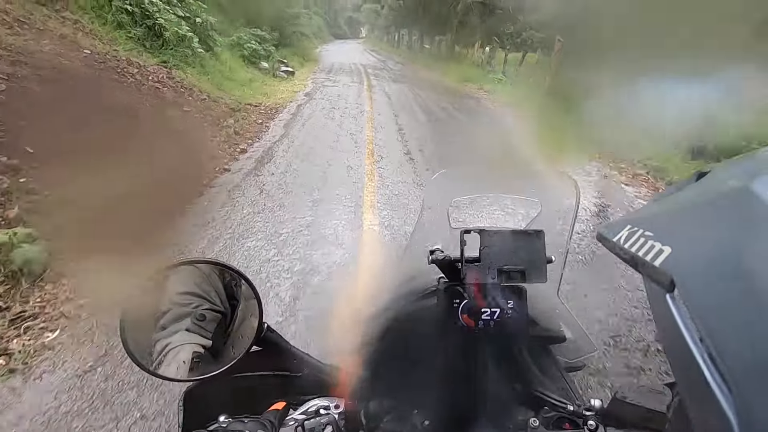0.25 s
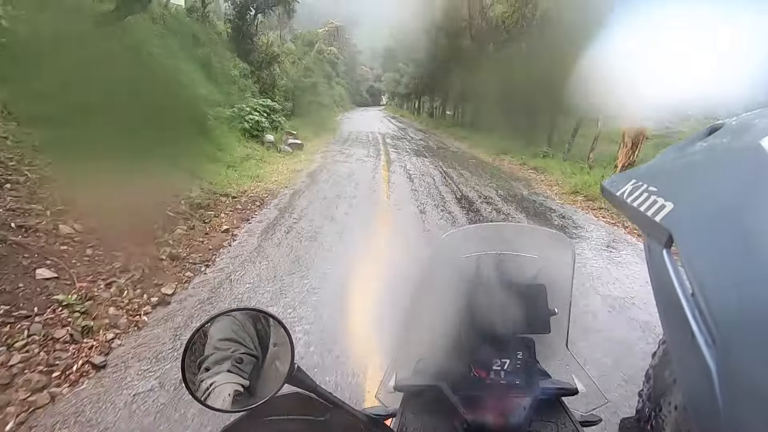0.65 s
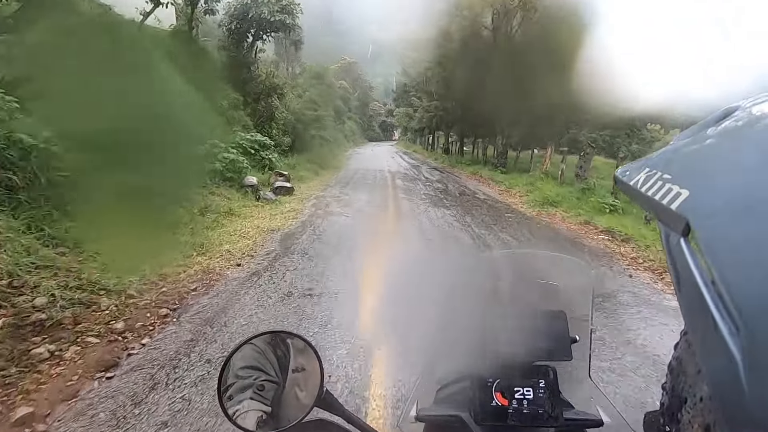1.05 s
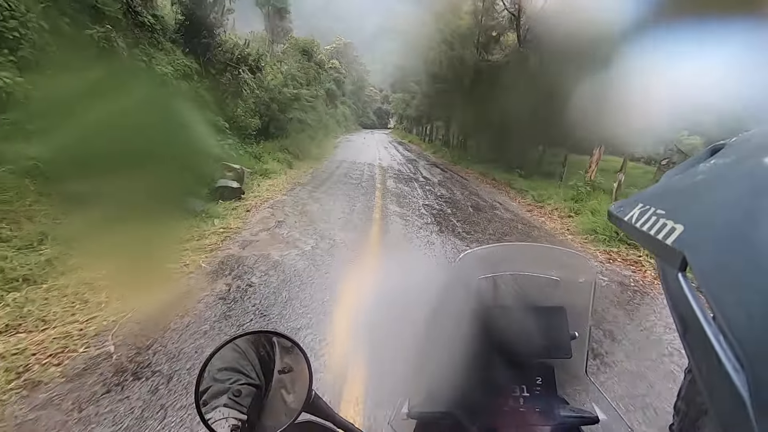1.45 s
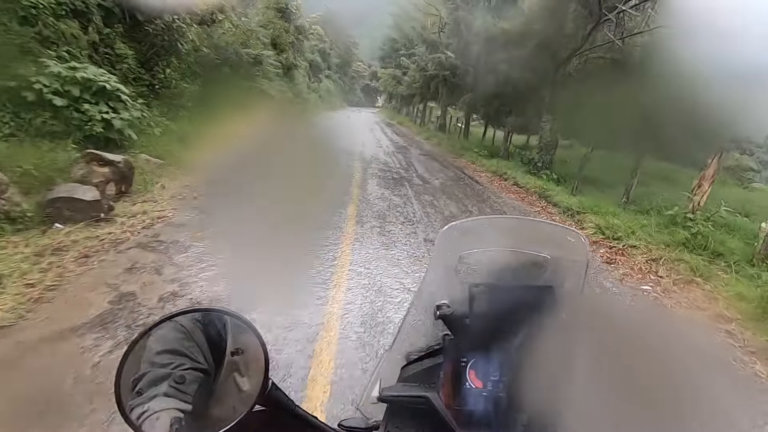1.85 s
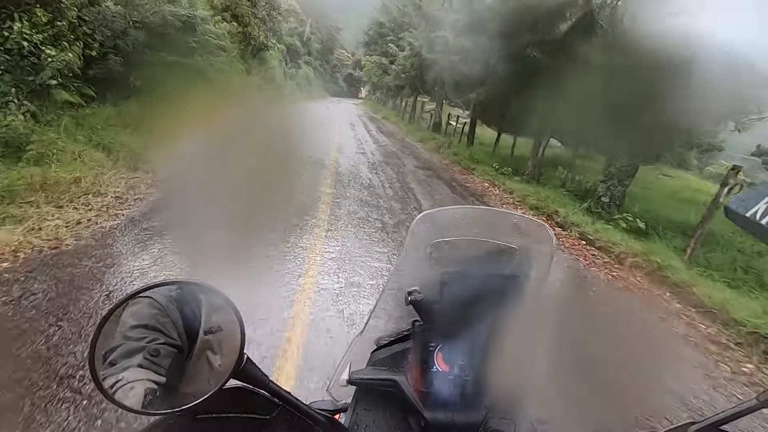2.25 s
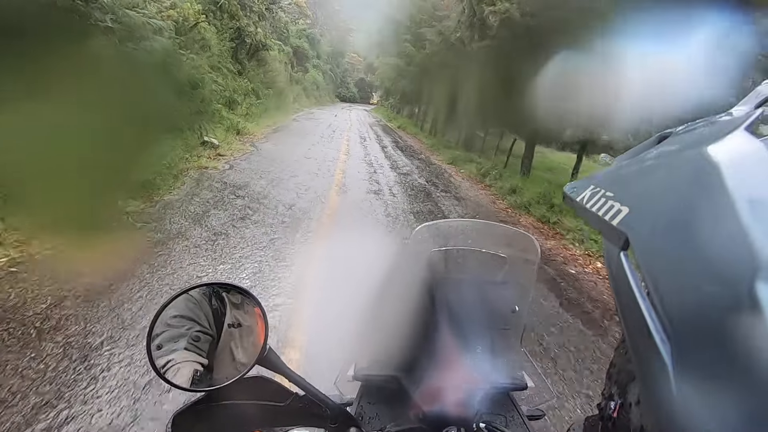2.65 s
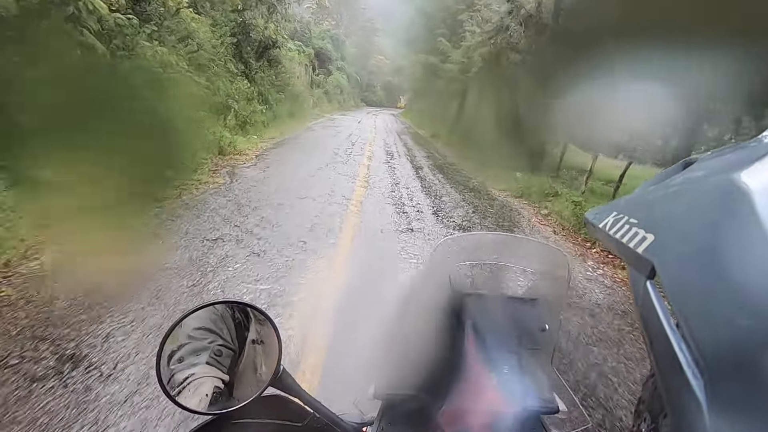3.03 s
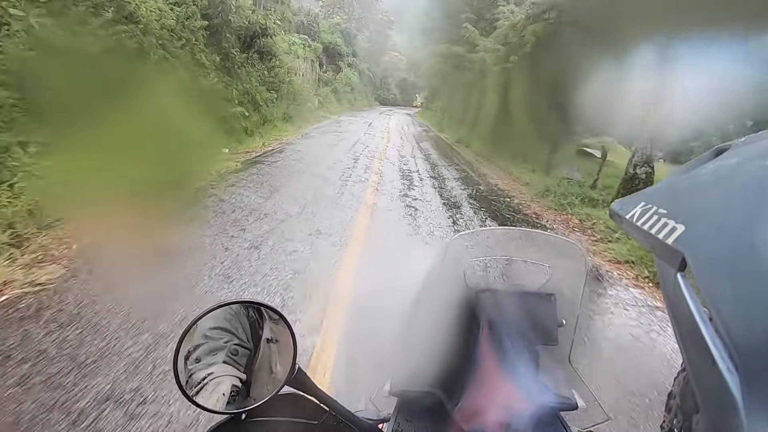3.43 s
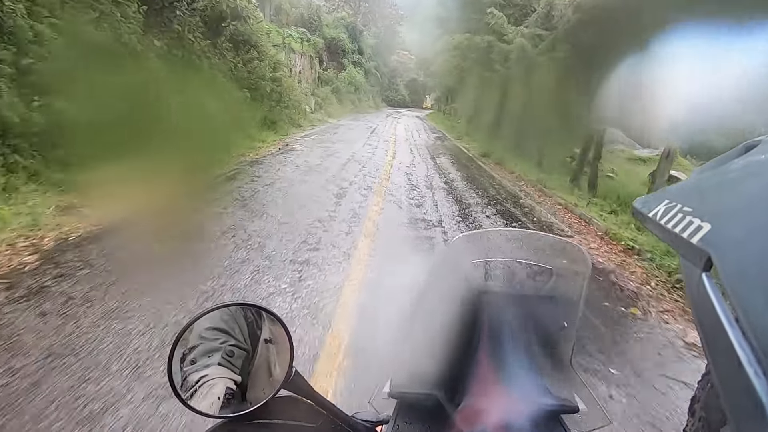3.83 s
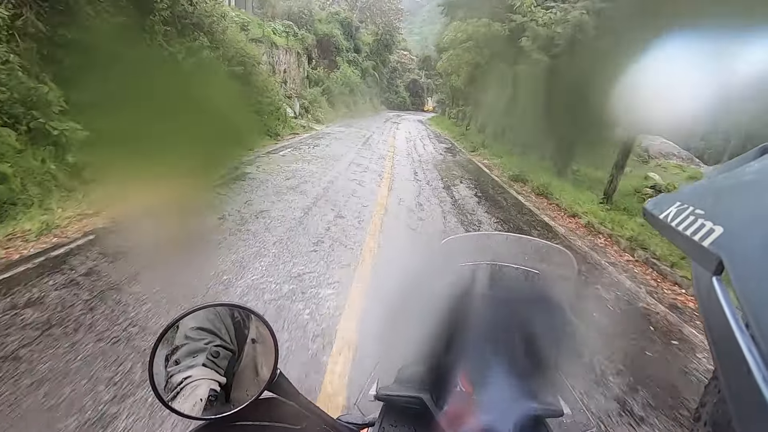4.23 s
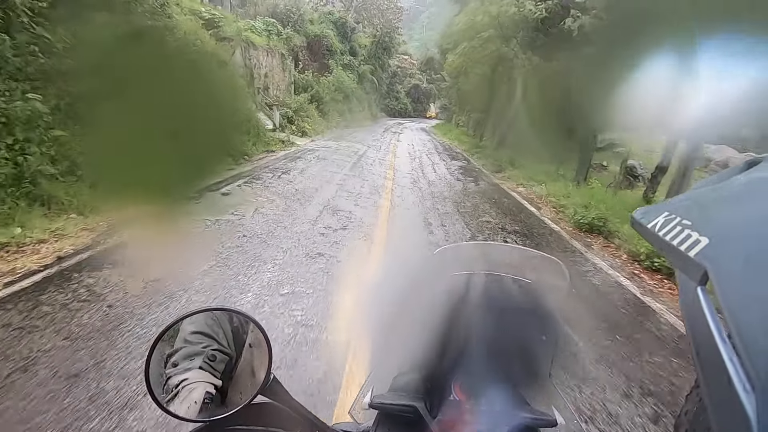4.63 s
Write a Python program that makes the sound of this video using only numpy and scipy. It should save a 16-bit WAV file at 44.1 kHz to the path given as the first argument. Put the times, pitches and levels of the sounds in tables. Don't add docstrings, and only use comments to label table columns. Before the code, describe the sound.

A motorcycle rides a wet open road in rain, heard from a small camera in the slipstream, close and dry. Continuous low wind rumble dominates, broken by irregular puffs. From 0 to 1 second it is mostly dull, with soft thumps around 0.3 to 0.5 and 0.9. Gusts grow after 1 second, and from about 1.9 to 2.9 they become a dense, brighter, ripping roar. The wind sags near 3.1, and short lulls sound hollow as the middle thins out; strong blows return around 3.8, 4.2, 4.3 and 4.8. Half buried, the engine's low hum rises until 2.6, then drops to a lower, wavering pitch, with a deeper frame vibration from about 2 seconds. Tyres hiss softly on wet tar, with a brief surge at 1.94 and more hiss after 3.5. Small spray bursts cluster from 1.2 onward; tiny sharp drops tick faintly on the housing throughout.

```python
import sys
import numpy as np
from scipy import signal
from scipy.fft import rfft, irfft
from scipy.io import wavfile
from scipy.ndimage import uniform_filter1d

SR = 44100
rng = np.random.default_rng(int(sys.argv[2]) if len(sys.argv) > 2 else 0)


def put_to_file(sound):
    columns = np.atleast_2d(sound).T
    safe = np.clip(columns, -1, 1)
    whole_steps = np.round(safe * 32767)
    wavfile.write(sys.argv[1], SR, whole_steps.astype(np.int16))


def gain_from_db(level_db):
    decades = np.asarray(level_db, float) / 20
    return 10 ** decades


N = 215384

# t/s, level/dB, extra brightness/dB
WIND = [(0.0, -38, -15), (0.45, -42.5, -7.5), (0.93, -37.5, -19.5), (1.04, -30, -17.5), (1.27, -29.5, -16),
        (1.55, -33, -7.5), (1.952, -30, 1.5), (2.022, -26, -2), (2.4, -26, -1), (2.523, -24, -5.5),
        (2.662, -28, -7), (2.882, -25.5, -7.5), (3.05, -31, -3), (3.361, -33.5, -6), (3.8, -29, -14),
        (4.06, -34.5, -10.5), (4.22, -24, -12), (4.42, -33.5, -10)]
# f/Hz, level per Hz/dB
RUMBLE_SPECTRUM = [(7.1, -46), (12, -3.5), (43, 0), (96, 2), (129, 3), (178, -7.5), (400, -25), (520, -49),
                   (880, -120)]
# t/s, half width/s, level change/dB
SHELTER = [
    (0.8, 0.023, -5),
    (2.4, 0.058, -5.5),
    (2.66, 0.037, -7.5),
    (3.14, 0.087, -9),
    (3.33, 0.042, -0.5),
    (4.08, 0.059, -6.5),
    (4.68, 0.1, -3),
]
# f/Hz, level per Hz/dB
BUFFET_SPECTRUM = [(60, -33.5), (150, 3.5), (250, 6), (400, 2.5), (850, -6.5), (2100, -15.5), (3000, -27.5),
                   (4300, -36), (5500, -52.5), (8000, -60.5), (14000, -88)]
# t/s, peak level/dB, brightness/dB
THUMPS = [(0.174, -16.5, -34), (0.231, -17, -16.5), (0.288, -14, -16), (0.375, -13, -19),
          (0.481, -12.5, -20.5), (0.878, -11.5, -21.5), (1.173, -19.5, -25), (1.476, -15.5, -27),
          (1.554, -15, -19), (1.647, -17.5, -16.5), (1.674, -10.5, -9.5), (2.672, -10.5, -11.5),
          (2.847, -14, -11.5), (3.01, -13.5, -19), (3.251, -19, -23), (3.276, -26.5, -12), (3.405, -9, -21),
          (3.557, -18.5, -23), (3.689, -22, -22), (3.805, -13.5, -8), (3.96, -16.5, -9.5),
          (3.996, -16, -17), (4.104, -10, -26), (4.196, -8.5, -11.5), (4.25, -15, -14.5),
          (4.319, -11.5, -16), (4.519, -18, -16), (4.607, -18, -9), (4.747, -12.5, -18),
          (4.807, -7.5, -22.5)]
# t/s, peak level/dB, brightness/dB
RIPS = [(0.866, -21.5, -6.5), (1.037, -20.5, -5), (1.157, -17, -7.5), (1.187, -12.5, -10.5),
        (1.32, -15, -11.5), (1.771, -12.5, -16.5), (1.885, -8, -9), (1.921, -13, -10), (1.988, -9.5, -1.5),
        (2.006, -14.5, -5), (2.04, -10, -7), (2.298, -9.5, -9.5), (2.363, -13.5, 1), (2.458, -21, -10),
        (2.493, -12.5, -4.5), (2.638, -8.5, -9.5), (2.681, -9, -11), (2.708, -16, -3.5), (2.729, -15, -5.5),
        (2.815, -14.5, -11), (3.005, -15.5, -5.5), (3.073, -12, -5), (3.162, -17.5, -8.5), (3.512, -16, -7),
        (3.774, -14.5, -13), (3.836, -11.5, -8), (3.891, -16, -4), (4.147, -11, -5.5), (4.29, -6.5, -6),
        (4.35, -13, -11.5), (4.676, -16.5, -5.5), (4.848, -10, -12.5)]
# t/s, peak level/dB, brightness/dB
PUFFS = [(0.027, -19.5, -11), (0.098, -18, -28), (0.126, -20, -15), (0.309, -32.5, -15), (0.407, -22, -9),
         (0.429, -27, -6), (0.504, -19, -11), (0.528, -29, 0), (0.616, -18.5, -10), (0.629, -19, -11),
         (0.734, -28.5, -4), (0.917, -20, -16), (0.991, -14.5, -15.5), (1.021, -14.5, -11),
         (1.078, -19, -6), (1.125, -23, -6), (1.216, -14, -9), (1.264, -22.5, -7.5), (1.359, -13, -14),
         (1.394, -32.5, -11), (1.609, -23.5, -14), (1.789, -9.5, -24), (2.067, -11.5, -2), (2.109, -11, -4),
         (2.134, -15, 0), (2.196, -13.5, -2), (2.254, -13.5, -11.5), (2.533, -6.5, -16), (2.588, -13.5, -6),
         (2.611, -8, -6.5), (2.798, -11, -25), (2.892, -13, -5.5), (2.909, -12.5, -2.5), (2.931, -13, -20),
         (3.177, -17.5, -6.5), (3.321, -24, -2.5), (3.363, -23, -4), (3.444, -15, -15.5),
         (3.491, -15, -10.5), (3.745, -13, -23.5), (3.855, -9, -10.5), (3.891, -18, -9), (3.97, -26.5, -7),
         (4.132, -26, -6.5), (4.237, -16, -7), (4.38, -14, -7), (4.773, -18.5, -5), (4.814, -14, -10)]
# t/s, firing f/Hz, level/dB
PULL = [(0, 96, -22), (.22, 95, -18), (.38, 100, -25.5), (.52, 96, -18.5), (.82, 99, -17), (1.05, 104, -17),
        (1.3, 109, -21), (1.5, 114, -16.5), (1.65, 118, -26.5), (1.9, 125, -23), (2.1, 131, -22.5),
        (2.35, 137, -21), (2.55, 141, -25), (2.62, 140, -26)]
# t/s, firing f/Hz, level/dB
CRUISE = [(2.7, 88.26, -18.5), (2.82, 95.74, -18), (3.0, 84.26, -27), (3.3, 83.97, -22.5),
          (3.45, 83.1, -18.5), (3.75, 79.7, -20.5), (3.9, 76.36, -21), (4.05, 81, -19), (4.18, 74, -17),
          (4.32, 63.8, -21), (4.45, 74.2, -25.5), (4.55, 84.6, -18.5), (4.7, 80.1, -24.5),
          (4.88, 76.3, -25)]
# t/s, f/Hz, level/dB
FRAME_SHAKE = [(1.85, 43.47, -30), (2.1, 44.4, -14.5), (2.3, 49.2, -23.5), (2.55, 49.93, -21.5),
               (2.9, 57, -17), (3.3, 55.56, -25.5), (3.65, 52.37, -21.5), (4.3, 53.43, -16.5),
               (4.88, 56.2, -28)]
# f/Hz, level per Hz/dB
SPRAY_SPECTRUM = [(250, -15), (700, 4), (1100, -5), (2000, -2.5), (2700, -5.5), (4000, -13), (4800, -19),
                  (5500, -27.5), (7900, -34.5), (8600, -43.5), (11000, -50.5)]
# t/s, level/dB
WET_ROAD = [(0, 3), (1.7, 5.5), (1.86, 6), (1.94, 14.5), (2.02, 4), (2.1, 3), (2.3, 0.5), (2.5, 2),
            (2.6, 3.5), (2.75, 0), (3.1, -2), (3.6, 7), (4.1, 7), (4.88, 6)]
# f/Hz, width f/Hz, level/dB
FAIRING_HOLLOWS = [(2910, 380, -10), (3800, 330, -18.5), (4250, 150, -19)]
# t/s, peak level/dB
SPLASHES = [(0.736, -29.5), (1.188, -31), (1.2725, -33.5), (1.3603, -25.5), (1.5335, -29.5),
            (1.5536, -26.5), (1.66, -31), (1.694, -27), (1.708, -28), (1.765, -26), (1.8916, -27),
            (1.9859, -22), (2.1114, -26), (2.138, -21), (2.239, -27), (2.2752, -25), (2.5446, -25),
            (2.6102, -19), (2.6449, -25), (2.7377, -28.5), (2.7975, -23.5), (2.8499, -27), (2.8734, -35),
            (2.9063, -22), (3.1752, -34), (3.2001, -35), (3.234, -29), (3.3642, -28), (3.38, -27),
            (3.4115, -29), (3.4456, -30), (3.4925, -29), (3.5099, -30), (3.5603, -27), (3.734, -27),
            (3.8541, -22), (3.902, -29), (3.9215, -25.5), (3.9667, -24), (3.9993, -32), (4.0375, -22.5),
            (4.1344, -25), (4.235, -21), (4.2886, -24.5), (4.354, -22), (4.54, -37), (4.6069, -26),
            (4.6853, -31), (4.7726, -31), (4.8156, -25)]
# f/Hz, level per Hz/dB
SPLASH_SPECTRUM = [(1200, -30.5), (2000, 2), (2800, 1), (4300, -9.5), (5300, -26.5), (9000, -43),
                   (14000, -69)]
# t/s, middle mode level/dB, upper mode level/dB, dull knock level/dB, middle f/Hz
LARGE_DROPS = [(0.3805, -50, -61, -45, 7500), (0.4474, -53, -58, -52, 8000), (0.8076, -51, -67, -46, 8000),
               (0.8589, -45, -66, -53.5, 8000), (1.3753, -44, -65, -36, 7450),
               (1.6536, -45, -68, -29, 8160), (1.7095, -38, -48, -18, 7200), (1.8238, -46, -70, -30, 7000),
               (1.8577, -29.5, -60, -42, 8000), (1.9265, -45, -53, -36, 8100),
               (2.3714, -41, -53, -22, 7000), (2.6803, -43, -73, -27, 6500), (2.797, -48, -80, -30, 7000),
               (2.9694, -58, -54, -43, 7000), (3.1098, -53, -82, -31, 6540), (2.8754, -52, -81, -38, 8300),
               (2.612, -64, -84, -31, 6500), (2.92, -67, -90, -23, 6500), (3.3864, -52, -56, -33, 7100),
               (3.3967, -34, -57, -47, 8300), (3.5109, -43, -62, -42, 8600), (3.5219, -41, -61, -46, 7000),
               (4.0374, -46, -56, -45, 7500), (4.0472, -33, -62, -30, 7300), (4.5526, -37, -66, -46, 7560),
               (4.4408, -57, -60, -47, 7500), (4.6558, -36, -56, -32, 7000), (0.006, -52, -66, -26, 6500)]
# t/s, peak level/dB
TICKS = [(0.0751, -53), (0.1325, -51), (0.563, -53), (1.0334, -58), (1.3103, -60), (1.436, -45),
         (1.6634, -54), (2.2784, -57), (2.6244, -57), (2.8329, -46), (2.8524, -54), (2.893, -60),
         (3.004, -44), (3.4345, -59), (3.5618, -55), (3.6314, -60), (3.7453, -50), (3.8544, -55),
         (3.9854, -49), (4.2134, -61), (4.2623, -54), (4.2857, -52), (4.3529, -56), (4.5945, -55),
         (4.6946, -57), (4.8648, -46.5)]
TICK_MODES_DB = (0, -15.5, 14.5)
# f/Hz, time to die by 60 dB t/s, level/dB
HOUSING_MODES = [
    (7000, .0013, 8),
    (10300, .0015, 15),
    (3750, .0028, 5),
]
# t/s, length t/s, from f/Hz, to f/Hz, depth level/dB
LULLS = [(2.65, .02, 500, 1300, -9), (3.122, .03, 300, 750, -13), (3.2, .05, 900, 1150, -9),
         (3.205, .04, 400, 750, -9), (3.285, .085, 450, 1150, -12), (3.452, .05, 400, 680, -14),
         (3.53, .022, 350, 680, -15), (3.575, .108, 350, 680, -14), (3.7, .015, 400, 1050, -9),
         (4.01, .085, 300, 980, -14), (4.38, .06, 330, 680, -15), (4.46, .052, 280, 680, -16),
         (4.535, .065, 380, 760, -12), (4.622, .05, 330, 680, -11)]
# f/Hz, level/dB
TOP_ROLL_OFF = [(11000, 0), (12500, -7), (13500, -10), (16000, -8)]
OPEN_TIMES = [.22, .39, .585, .74, .775, 1.18, 2.675, 2.8, 2.93, 3.72, 4.36, 4.53, 4.62, 4.66, 4.81]


def evened(x):
    return x / np.sqrt(np.mean(x ** 2) + 1e-20)


def read(points, hz):
    f, value = np.transpose(points)
    return np.interp(np.log(hz + 1), np.log(f + 1), value)


def coloured(x, points):
    gain = gain_from_db(read(points, np.fft.rfftfreq(N, 1 / SR)))
    return irfft(rfft(x) * evened(gain), N)


def resonate(x, hz, width_hz):
    turn = np.exp(2j * np.pi * np.cumsum(hz * np.ones(len(x))) / SR)
    r = np.exp(-np.pi * width_hz / SR)
    return 2 * (turn * signal.lfilter([1 - r], [1, -r], x / turn)).real


def patches(shape, bins, frames):
    field = rng.standard_normal(shape[::-1]).T
    for _ in range(2):
        field = uniform_filter1d(uniform_filter1d(field, bins, 0), frames, 1)
    return evened(field)


def short_spectra(x):
    return signal.stft(x, SR, nperseg=256, noverlap=192)


def joined(z):
    return signal.istft(z, SR, nperseg=256, noverlap=192)[1][:N]


def butter(x, hz, kind):
    return signal.sosfilt(signal.butter(2, hz, kind, fs=SR, output="sos"), x)


def scattered(per_s):
    draws = rng.standard_normal((round(per_s * N / SR), 3))
    places = (np.arange(len(draws)) + rng.random(len(draws))) / len(draws)
    return places * (N - 1) / SR, draws


def rumble():
    t = np.arange(N) / SR
    s, gust_db, _ = np.transpose(WIND)
    level_db = -15.5 + 0.11 * (np.interp(t, s, gust_db) - gust_db.mean())
    for at, half, db in SHELTER:
        level_db = level_db + db * np.exp(-((t - at) / half) ** 2)
    air = coloured(rng.standard_normal(N), RUMBLE_SPECTRUM[:-1] + [(900, -80.5)])
    firing_hz = np.interp(t, *np.transpose(PULL + CRUISE)[:2])
    near_firing = resonate(air, firing_hz, width_hz=40)
    return gain_from_db(level_db) * (air - 0.55 * near_firing)


def buffeting():
    hz, t, z = short_spectra(rng.standard_normal(N))
    s, level_db, bright_db = np.transpose(WIND)
    gust_db = np.interp(t, s, level_db)
    high = np.clip(np.log((hz[:, None] + 1) / 650) / np.log(3.9), 0, 1.3)
    lumps_db = 1.7 * patches((1, len(t)), bins=1, frames=5) + 2.64 * patches(z.shape, bins=5, frames=5)
    lumps_db = lumps_db * (1 - 0.032 * high)
    lumps_db = lumps_db + 1.3 * patches((1, len(t)), bins=1, frames=24)
    lumps_db = lumps_db * np.interp(gust_db, [-34, -24], [1.1, 0.5])
    cap_db = 5.5
    lumps_db = np.where(lumps_db > 0, cap_db * np.tanh(lumps_db / cap_db), lumps_db)
    middle = np.exp(-np.log((hz[:, None] + 1) / 800) ** 2 / 0.56)
    lumps_db = lumps_db + 0.74 * middle * np.maximum(gust_db + 30, 0)
    field_db = gust_db + 3.5 + high * (np.interp(t, s, bright_db) + 8.5) + lumps_db
    return coloured(joined(z * gain_from_db(field_db)), BUFFET_SPECTRUM)


def all_eddies():
    thumps = [(at, db - 1.5, bright_db - 1.5, 0.047) for at, db, bright_db in THUMPS]
    rips = [(at, db - 2.5, bright_db - 0.5, 0.04) for at, db, bright_db in RIPS]
    puffs = [(at, db + 0.5, bright_db, 0.026) for at, db, bright_db in PUFFS]
    times, draws = scattered(per_s=5)
    s, gust_db, _ = np.transpose(WIND)
    peaks_db = np.minimum(np.interp(times, s, gust_db), -29.0) + 1 + 7.5 * draws[:, 0]
    small = [(at, db, -10.5 + 4.8 * d, 0.02) for at, db, d in zip(times, peaks_db, draws[:, 1])]
    return thumps + rips + puffs + small


def eddies():
    t = np.arange(4000) / SR
    strength = np.zeros((2, N + len(t)))
    rise_s = np.array([[0.0021], [0.0029]])
    rise = (1 - np.exp(-t / rise_s)) ** 2
    rows = all_eddies()
    for at, peak_db, bright_db, t60 in rows:
        fall_db = -60 * (t / np.clip(t60, 0.01, 0.2)) ** 1.35
        parts_db = np.array([fall_db, bright_db + 13.5 + 0.84 * fall_db])
        start = round((at - 0.0029) * SR)
        strength[:, start:][:, :len(t)] += gain_from_db(peak_db + 0.5 + parts_db) * rise
    air = rng.standard_normal((2, N))
    for at, *_ in rows:
        air[:, round(at * SR) + 70:][:, :1] += np.array([[7.5], [2.5]])
    body, treble = air * strength[:, :N]
    body = butter(body, 1000, "low")
    treble = butter(treble, 1000, "high")
    under_top = butter(treble, 2530, "low")
    leak = 0.45
    return coloured(body + leak * treble + (1 - leak) * under_top, BUFFET_SPECTRUM)


def order(rows, lift_db):
    s, hz, level_db = np.transpose(rows)
    t = np.arange(N) / SR
    wobble = evened(uniform_filter1d(rng.standard_normal(N), size=2000))
    swell = evened(uniform_filter1d(rng.standard_normal(N), size=2000))
    turns = np.cumsum(np.interp(t, s, hz) + 2.4 * wobble) / SR
    sounding = uniform_filter1d(1.0 * (t >= s[0]) * (t <= s[-1]), size=4000, mode="nearest")
    uneven = gain_from_db(2.4 * uniform_filter1d(swell, size=500))
    return gain_from_db(np.interp(t, s, level_db) + lift_db) * uneven * sounding * np.sin(2 * np.pi * turns)


def engine():
    return order(PULL, lift_db=1.0) + order(CRUISE, lift_db=-0.1) + order(FRAME_SHAKE, lift_db=0.0)


def spray():
    hz, t, z = short_spectra(rng.standard_normal(N))
    soft_db = 1.7 * patches(z.shape, bins=4, frames=20) + 1.0 * patches((1, len(t)), bins=1, frames=6)
    hiss = joined(z * gain_from_db(soft_db))
    droplets = rng.random(N) < 900 / SR
    grit = droplets * gain_from_db(4.0 * np.minimum(rng.exponential(1, N), 5)) * rng.choice([-1, 1], N)
    wet = evened(hiss) + 0.45 * evened(grit)
    rings = np.zeros(N)
    for f, width, db in FAIRING_HOLLOWS:
        rings += gain_from_db(db) * evened(resonate(resonate(wet, f, width), f, width))
    level_db = -45 + np.interp(np.arange(N) / SR, *np.transpose(WET_ROAD))
    return gain_from_db(level_db) * (coloured(wet, SPRAY_SPECTRUM) + 0.2 * rings)


def splashes():
    t = np.arange(1500) / SR
    strength = np.zeros(N + 1500)
    shape = (1 - np.exp(-t / 0.0013)) ** 2 * np.exp(-t / 0.0047)
    for s, peak_db in SPLASHES:
        strength[round(s * SR) - 40:][:1500] += gain_from_db(peak_db - 9.5) * shape / shape.max()
    return coloured(rng.standard_normal(N) * strength[:N], SPLASH_SPECTRUM)


def all_drops():
    times, draws = scattered(per_s=8.9)
    ticks = [(s, *(db + np.array(TICK_MODES_DB)), 6400 + 1800 * u)
             for (s, db), u in zip(TICKS, rng.random(len(TICKS)))]
    modes_db = np.array([-59, -70.5, -50.5])
    drizzle = [(s, *(modes_db + 5 * d), 7000 + 500 * d[1]) for s, d in zip(times, draws)]
    return LARGE_DROPS + ticks + drizzle


def drops():
    out = np.zeros(N + 400)
    t = np.arange(400) / SR
    rise = 1 - np.exp(-t / 0.00018)
    for s, *levels_db, middle_hz in all_drops():
        detune = rng.uniform(0.94, 1.06, 3)
        detune[0] = middle_hz / HOUSING_MODES[0][0]
        for db, (hz, t60, gain_db), d in zip(levels_db, HOUSING_MODES, detune):
            ring = np.sin(2 * np.pi * hz * d * t)
            out[round(s * SR):][:400] += gain_from_db(db + gain_db - 60 * t / t60) * rise * ring
    return out[:N]


def ceiling(hz, t, z):
    s, gust_db, bright_db = np.transpose(WIND)
    block = (t * SR / 1024).astype(int)
    edge_hz = 12750 + 35 * np.interp(block * 1024 / SR, s, gust_db + bright_db + 40)
    edge_hz = edge_hz + 250 * rng.standard_normal(block.max() + 1)[block]
    edge_hz[abs(t[:, None] - OPEN_TIMES).min(1) < 0.011] = 15700
    loud = abs(z) > 5 * np.median(abs(z), 1, keepdims=True)
    return (hz[:, None] < edge_hz) | loud


def wind_filter_db(hz, t):
    cut_db = np.zeros((len(hz), len(t)))
    for s, length, lo_hz, hi_hz, depth_db in LULLS:
        band = np.clip(np.minimum(hz - lo_hz, hi_hz - hz) / 30 + 0.5, 0, 1)
        moment = np.clip(np.minimum(t - s, s + length - t) / 0.004 + 0.5, 0, 1)
        cut_db = np.minimum(cut_db, depth_db * np.outer(band, moment))
    return cut_db


def scene():
    wind = rumble() + buffeting() + eddies()
    water = spray() + splashes() + drops()
    return (wind + engine() + water)[None]


def low_pass(x):
    return signal.sosfilt(signal.butter(12, 15680, fs=SR, output="sos"), x)


def record(dry):
    hz, t, z = signal.stft(dry[0], SR, nperseg=768, noverlap=640)
    gain = gain_from_db(wind_filter_db(hz, t) + read(TOP_ROLL_OFF, hz)[:, None])
    z = z * ceiling(hz, t, z) * gain
    filtered = signal.istft(z, SR, nperseg=768, noverlap=640)[1][:N]
    limited = 1.2 * np.tanh(filtered / 1.2)
    return low_pass(limited[None])


dry = scene()
out = record(dry)
put_to_file(out)
```